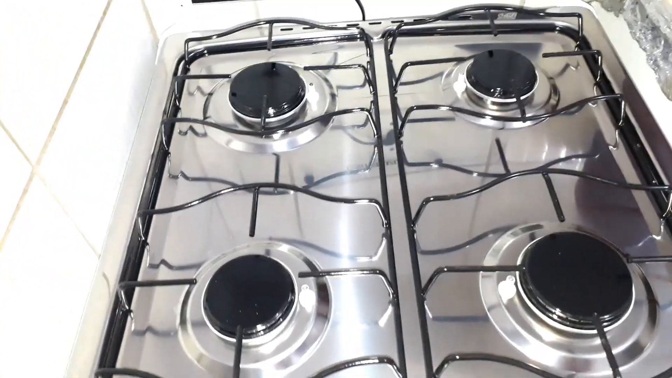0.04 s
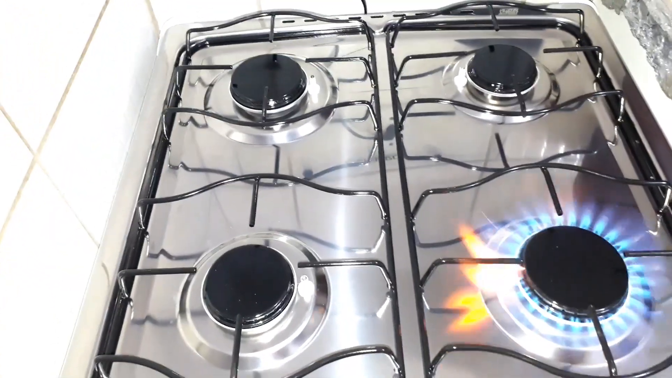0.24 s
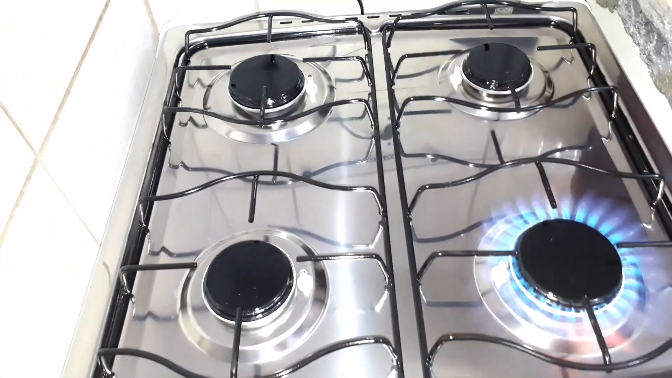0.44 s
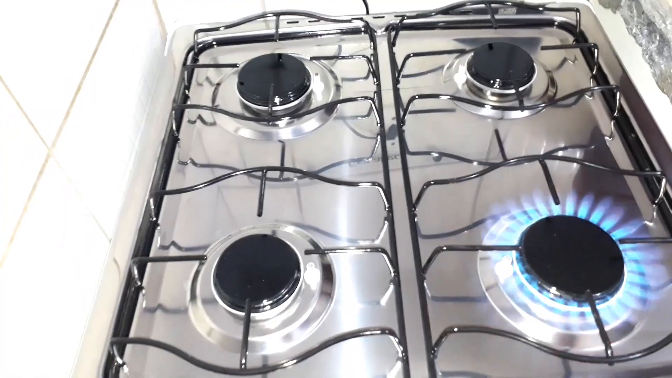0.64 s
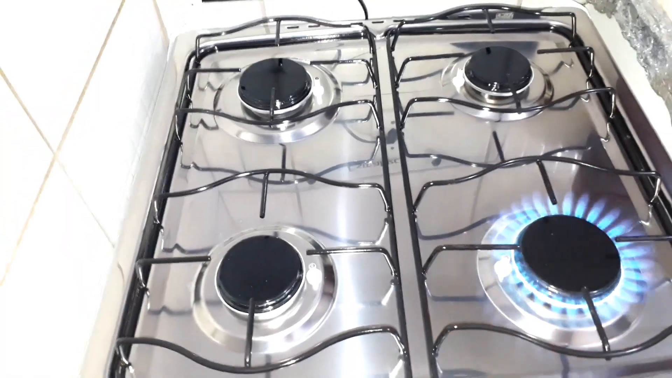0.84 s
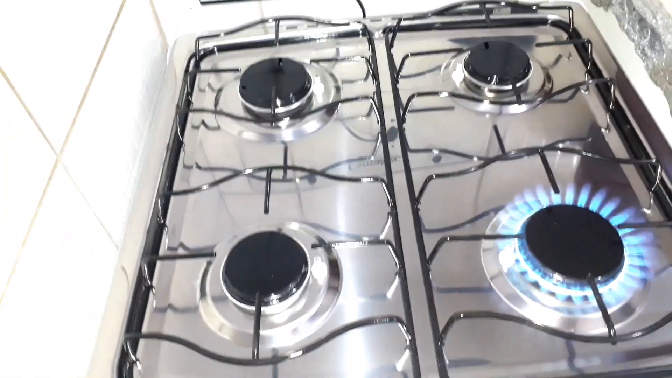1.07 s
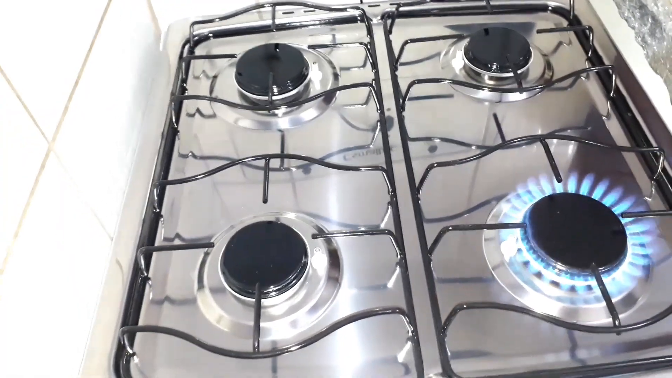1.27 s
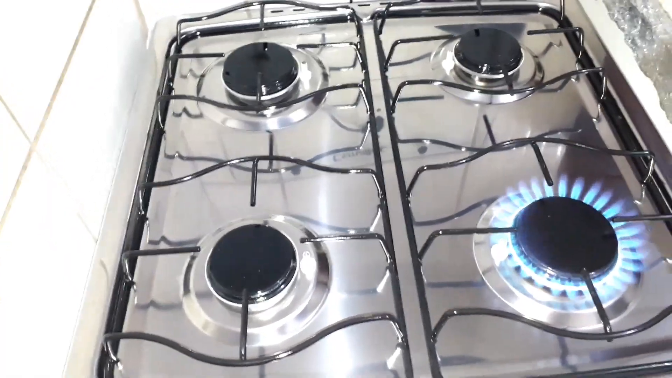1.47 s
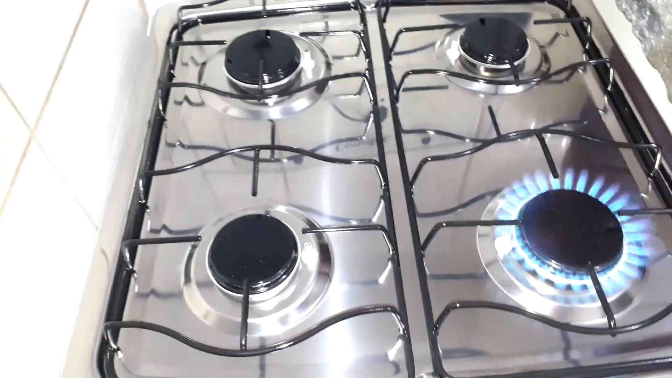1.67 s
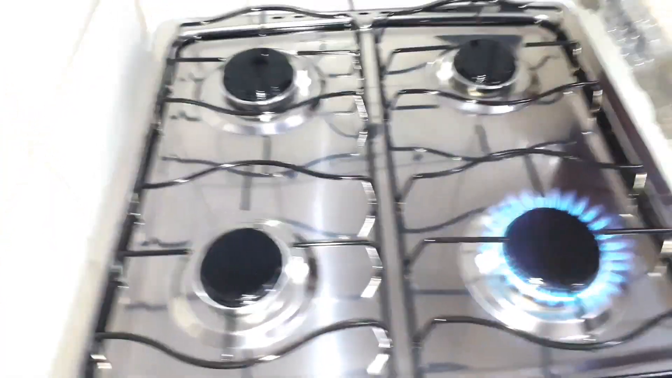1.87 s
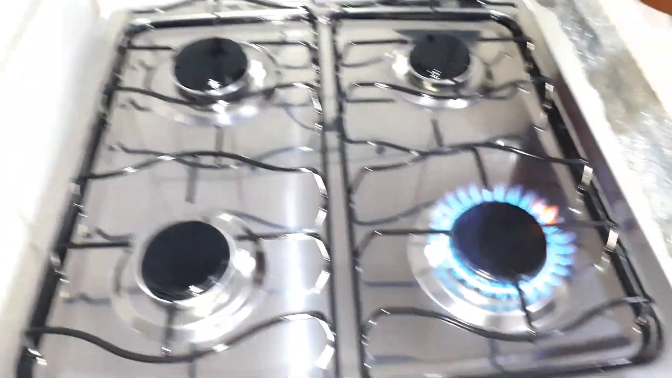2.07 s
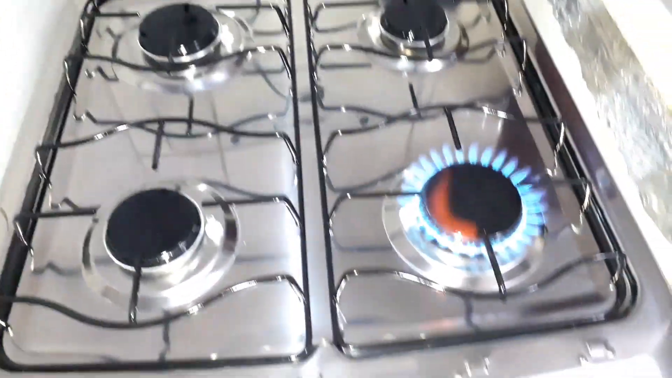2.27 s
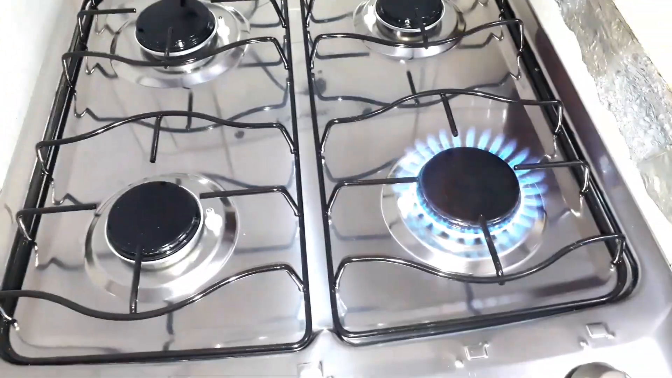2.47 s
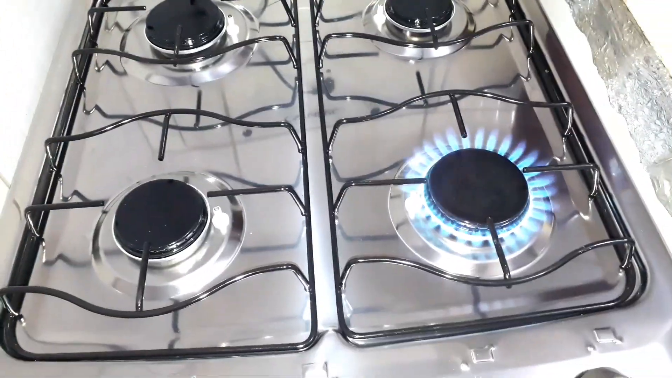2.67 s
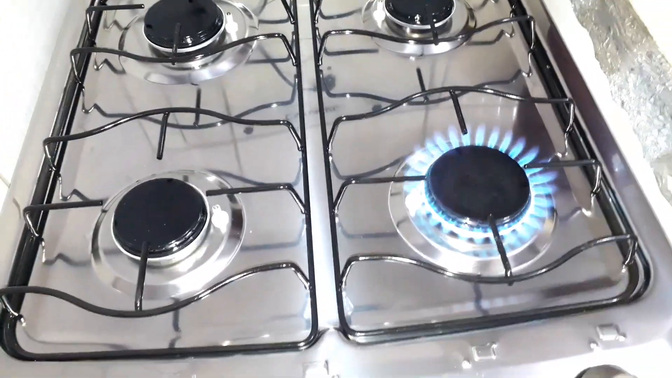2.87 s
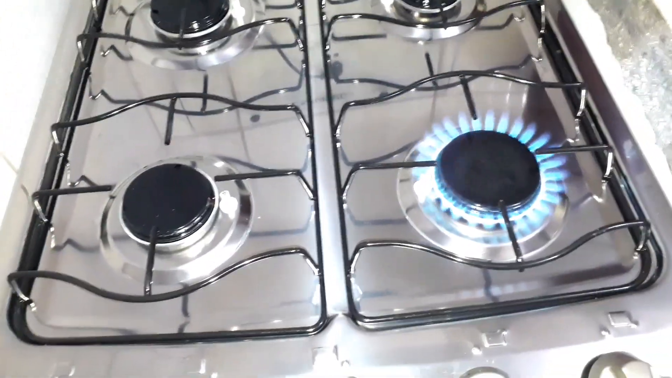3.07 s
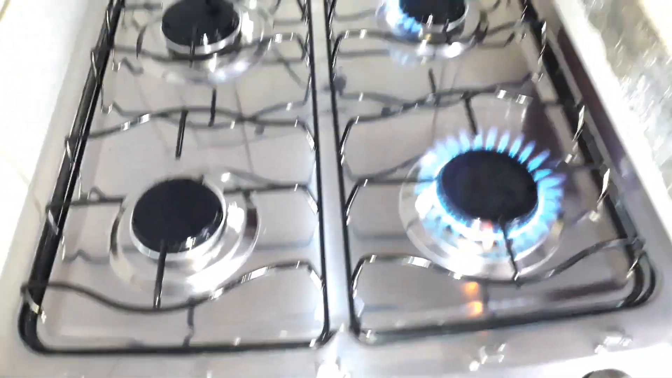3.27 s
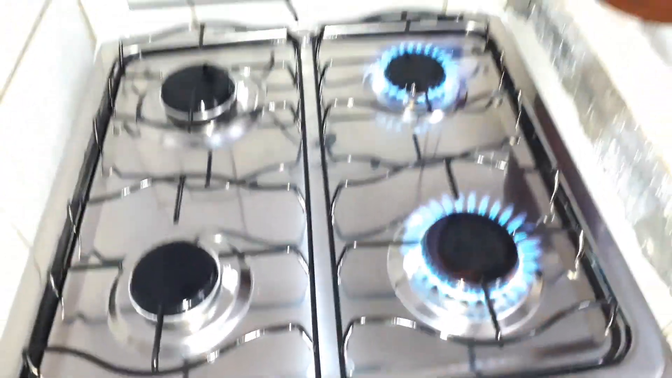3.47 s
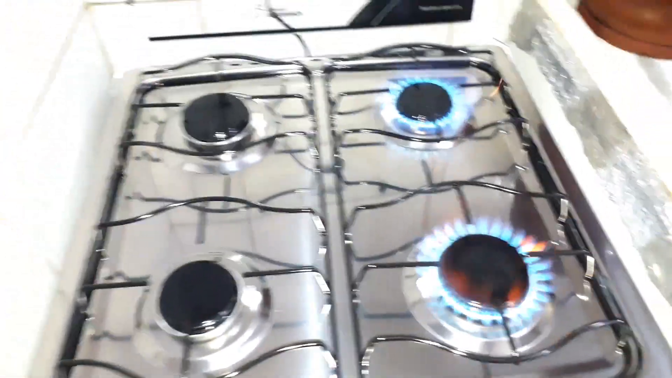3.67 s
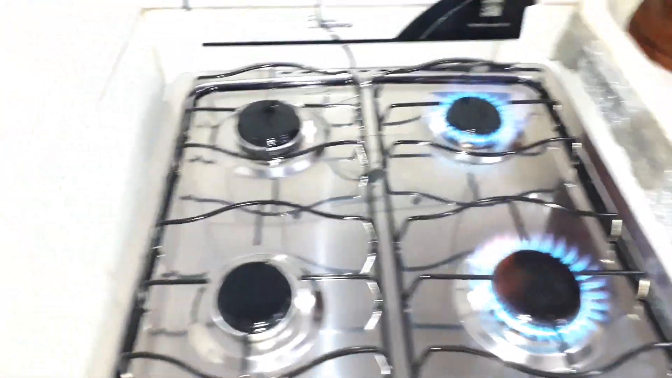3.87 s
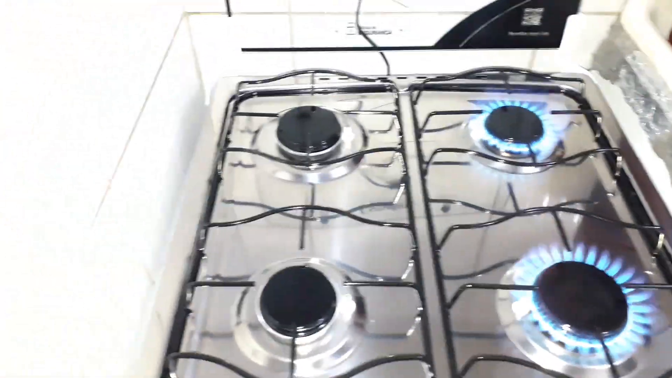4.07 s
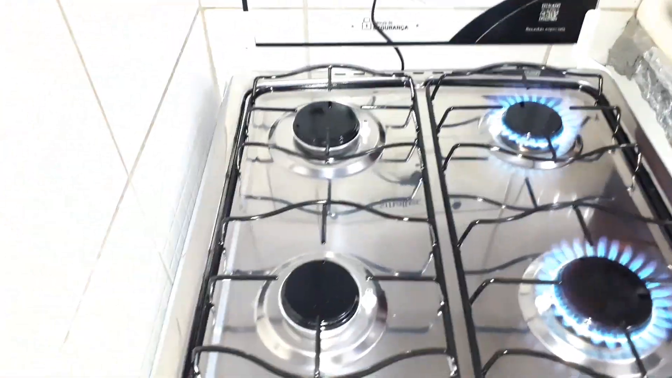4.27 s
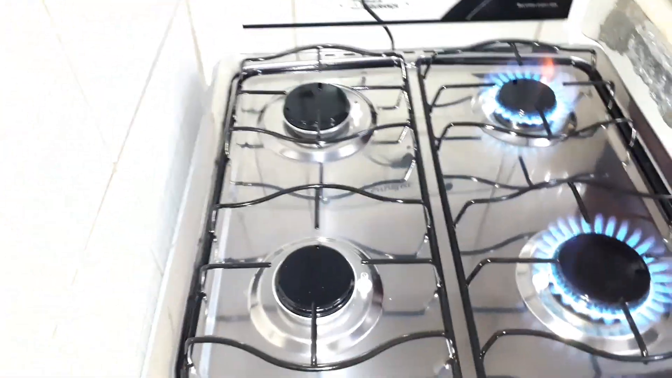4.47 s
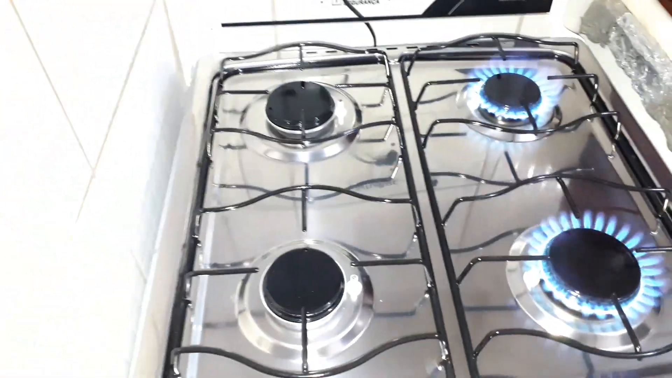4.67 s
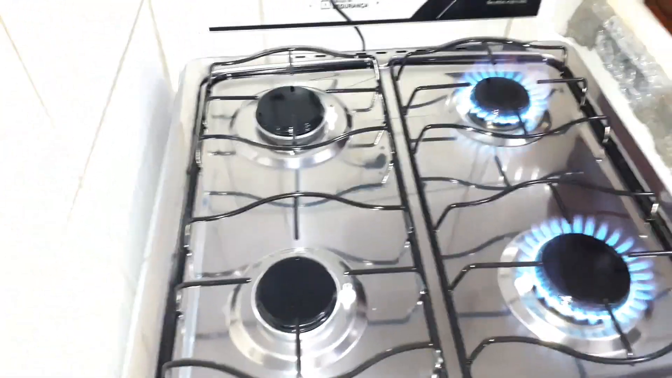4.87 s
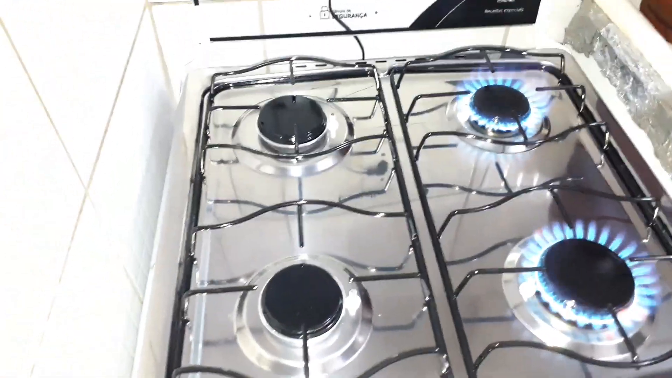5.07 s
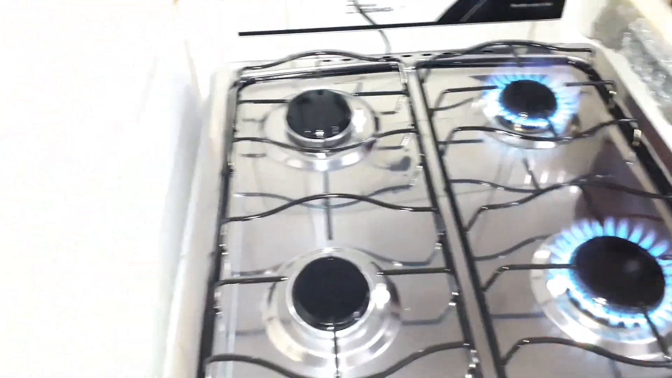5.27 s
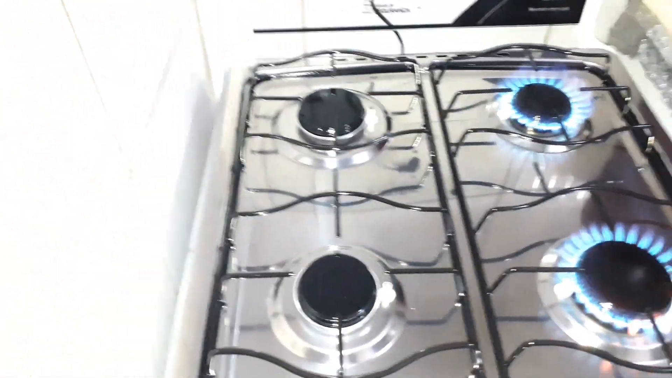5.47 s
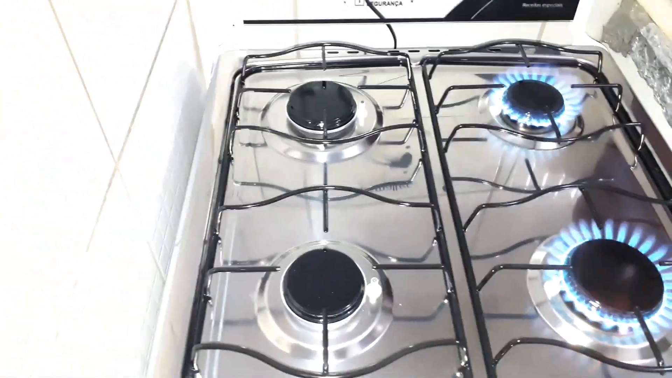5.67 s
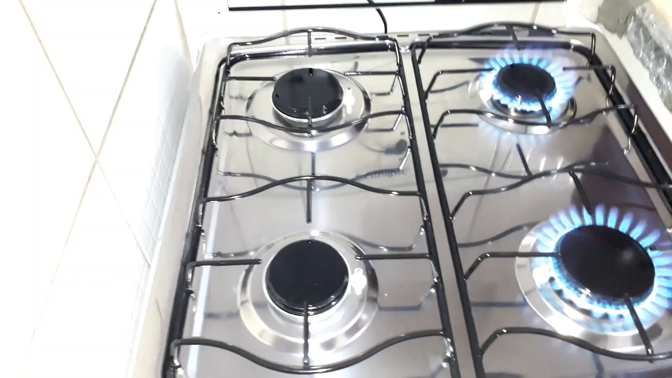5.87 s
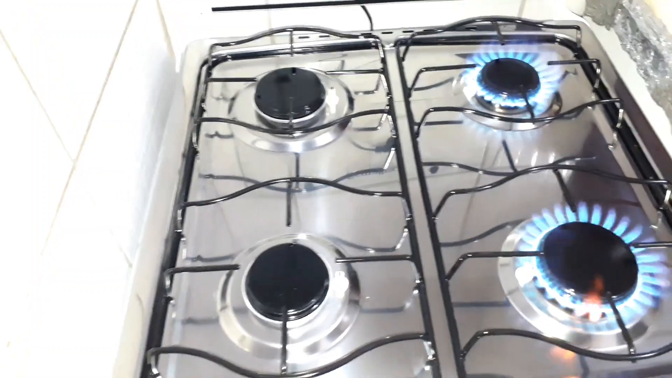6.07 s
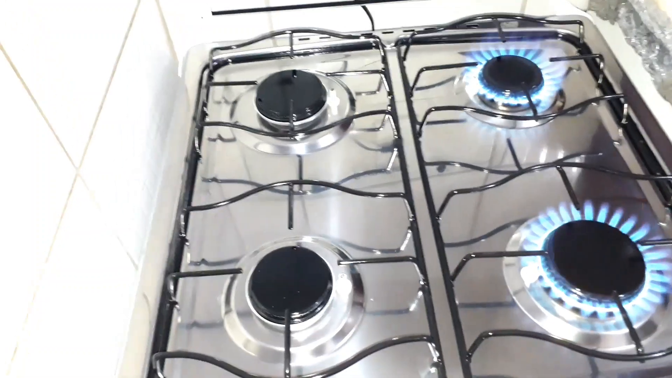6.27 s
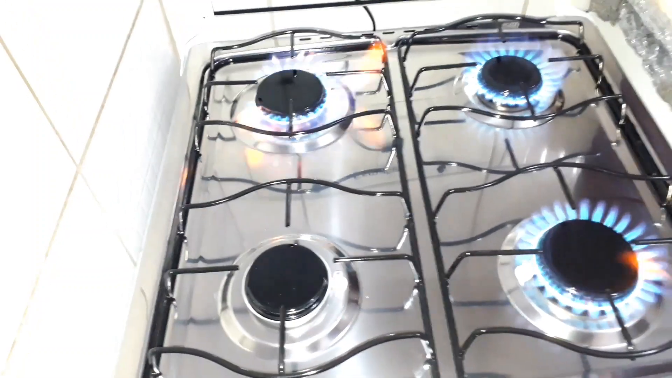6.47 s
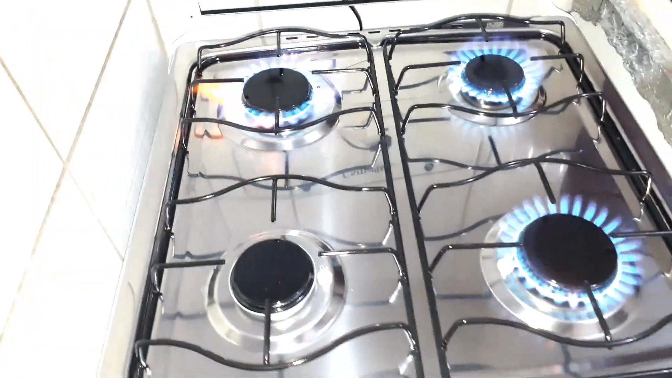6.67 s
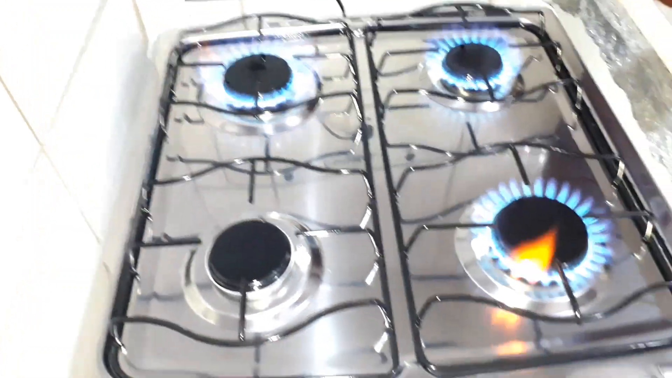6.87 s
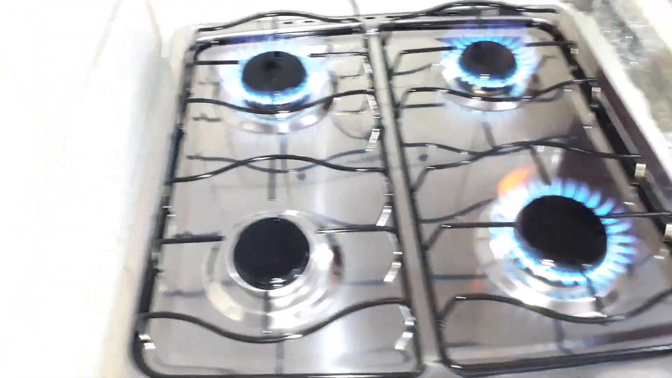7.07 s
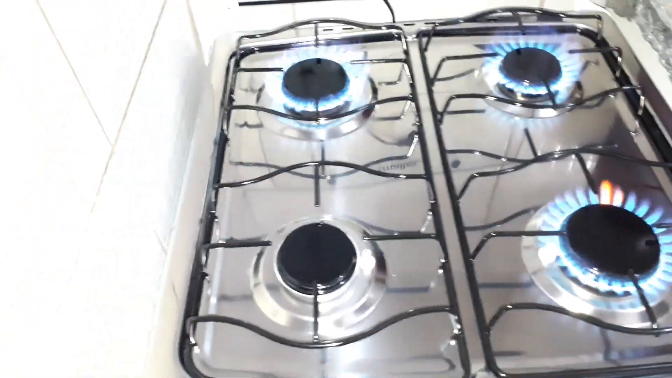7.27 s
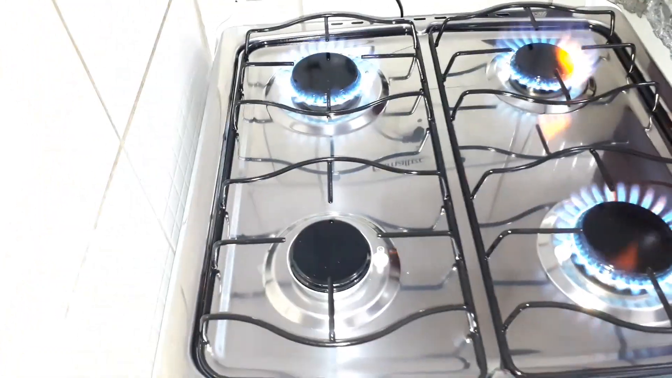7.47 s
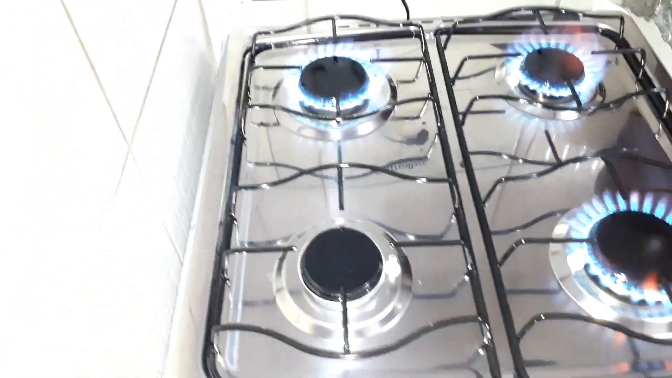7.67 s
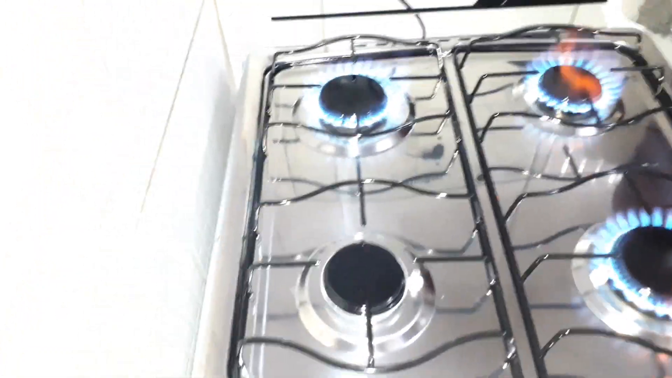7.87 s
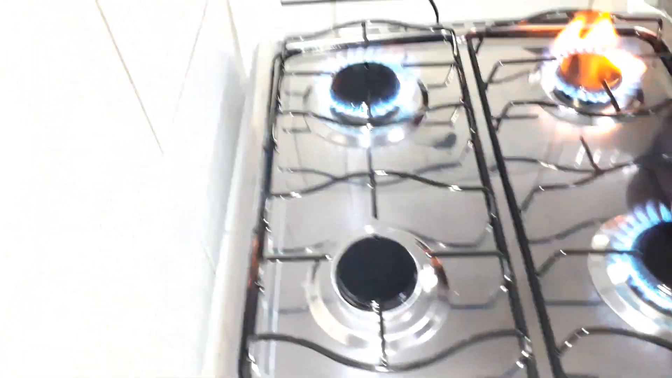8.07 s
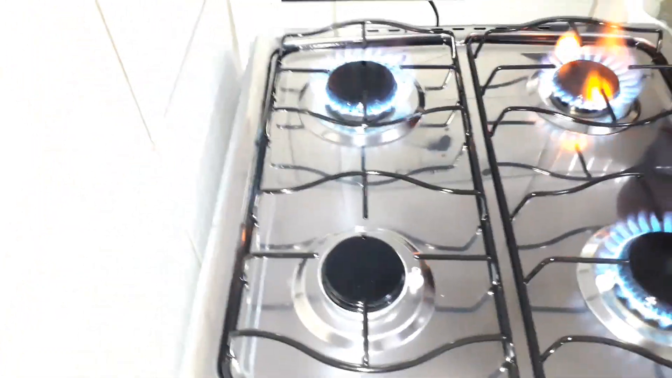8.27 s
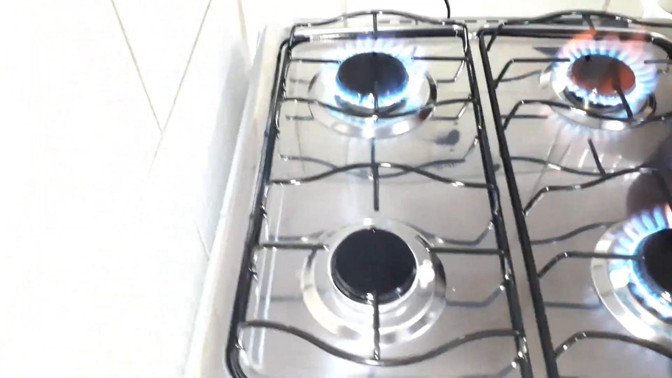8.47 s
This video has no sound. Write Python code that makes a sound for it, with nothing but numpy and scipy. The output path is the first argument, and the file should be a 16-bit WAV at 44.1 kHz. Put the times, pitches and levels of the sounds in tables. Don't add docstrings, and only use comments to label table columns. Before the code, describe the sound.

Close bursts of rapid electric spark snaps, with hard knob clacks and panel thumps between them, over softly hissing, growing gas flames.

```python
import sys
import numpy as np
from scipy import signal
from scipy.fft import rfft, irfft, next_fast_len
from scipy.io import wavfile
from scipy.ndimage import uniform_filter1d

SR = 44100
rng = np.random.default_rng(int(sys.argv[2]) if len(sys.argv) > 2 else 0)


def to_linear_factor(level_db):
    exponent = np.asarray(level_db, float) / 20
    return 10 ** exponent


def to_wav(s):
    ch = np.atleast_2d(s).T
    pcm = np.round(np.clip(ch, -1, 1) * 32767)
    wavfile.write(sys.argv[1], SR, pcm.astype(np.int16))


N = 376173
KNOCK_DELAY_S = .0006
TAIL_SAMPLES = 28000
MAINS_HZ, MAINS_DB = 58.2, -73.5
RECOVER_DB_PER_S = 17.5
SWELL_RISE_DB_PER_S = 86
BODY_DB, BODY_WIDTH = 1.5, .45
EDGE_HZ = 4700

# (frequency [Hz], density [dB/Hz])
RUMBLE_COLOUR = [(26, -47.5), (45, -23.5), (76, -9), (167, 1), (278, -15.5), (318, -8), (354, -23.5),
                 (409, -16), (450, -22.5), (580, -44), (990, -120)]
ROAR_COLOUR = [(260, -21.5), (450, -0.5), (472, -3.5), (1030, -8), (1180, -10), (1700, -16), (2200, -40),
               (3520, -120)]
FLUTTER_COLOUR = [(940, -30.5), (1600, -2), (2330, 0), (2900, -3), (3140, -2.5), (3800, -10.5), (4940, -40),
                  (8360, -120)]
HISS_COLOUR = [(2240, -31), (3800, -5.5), (5500, -5), (6090, -4), (6920, -5), (8750, -10), (10500, -12),
               (13600, -36), (22000, -120)]
THIN_HISS_COLOUR = [(6180, -31), (10500, 2.5), (15100, -0.5), (16200, -13), (16500, -39)]
# (frequency [Hz], width [Hz], lift [dB])
NOZZLE_MODES = [(2470, 120, 2.5), (3050, 70, 5), (5900, 300, 1.5), (8900, 600, 10), (10600, 300, -1.5)]
# (frequency [Hz], level [dB rms])
JET_WHINES = [(4258, -88.5), (5798, -86), (5857, -87.5), (6331, -84), (7693, -96.5), (8043, -88.5),
              (8699, -91.5), (8872, -85), (10174, -87.5)]
# (frequency [Hz], level [dB rms])
TUBE_DRONES = [(317.6, -70.5), (419.9, -71), (473.7, -75), (619.1, -75), (1007, -81)]
BURNERS_LIT = [
    .2,
    3.25,
    6.45,
]
# (peak time [s], roar [dB], fall [dB/s],
# brightness [dB], depth [dB])
SWELLS = [(0.021, -46, 27, -8, -3), (1.7, -53.5, 14.5, 0, 3), (3.0, -56, 38.5, -11, -15),
          (3.36, -48.5, 12.5, -5.5, -5.5), (3.6, -65, 30, 1.5, -4), (3.85, -68.5, 40, -4, 13.5),
          (.57, -69, 60, 3, -3), (5.36, -46.5, 37, 1.5, 0), (6.48, -42.5, 49.5, -7.5, -6),
          (8.1, -63.5, 20, 14.5, 6.5), (8.5, -51, 30, -15, 6.5)]
# (time [s], depth [dB], hold [s])
GAIN_DUCKS = [
    (0.401, -15, 0.31),
    (1.6, -3, 0.72),
    (2.3, -4, 0.51),
    (3.35, -10, 0.58),
    (5.3, -4.5, 0.33),
    (5.8, -0.5, 0.37),
    (6.65, -12, 0.23),
    (7.95, 2, 0.52),
]

# (frequency [Hz], T60 [s])
KITCHEN_T60 = [(100, 0.69), (260, 0.67), (700, 0.69), (1840, 0.48), (4850, 0.38), (12800, 0.29)]
# (frequency [Hz], width [Hz], lift [dB])
OVEN_MODES = [(173, 15, 3), (262, 26, 10), (320, 3.1, 6.5), (417, 35, 1), (807, 44, 1.5), (1047, 40, 3.5),
              (1680, 61, 3), (2030, 66, 4.5), (2800, 68, 4), (3230, 70, 6), (3600, 150, 3), (4200, 120, 1),
              (8900, 380, 5)]
# (time [s], peak [dB], frequency [Hz], T60 [s])
THUMPS = [(1.528, -51, 250, 0.15), (1.981, -28, 151, 0.058), (2.227, -32, 399.6, 0.15),
          (2.252, -28, 267.4, 0.16), (5.147, -45, 270, 0.12), (5.182, -21, 189, 0.33),
          (5.736, -24, 279, 0.2), (5.751, -26.5, 320, 0.34), (6.207, -26.5, 320, 0.4),
          (7.884, -16.5, 403, 0.19), (7.895, -24, 262.2, 0.43), (8.454, -34.5, 294, 0.28)]
# (time [s], peak [dB], frequency [Hz], T60 [s])
CLINKS = [(.02, -40, 1153, 0.34), (.345, -40.5, 2210, 0.11), (1.5232, -24.5, 3690, 0.27),
          (1.524, -24, 3300, 0.092), (1.53, -28.5, 4060, .2), (1.5235, -27, 1750, .12),
          (1.5235, -28, 2972, .2), (1.524, -30, 820, .3), (1.5245, -34, 4400, .08),
          (2.8462, -34.5, 1798, .2), (2.8465, -28, 5400, .09), (2.8495, -25, 6500, .04),
          (2.8475, -32, 8484, .15), (2.846, -42, 1480, 0.22), (2.862, -38.5, 1667, .2),
          (2.879, -38, 1350, 0.16), (2.883, -38, 5350, .12), (5.1243, -20.5, 1680, .05),
          (5.1243, -28.5, 1100, .06), (5.124, -26, 3100, .015), (5.124, -33, 4000, .015),
          (5.137, -26, 1050, .08), (5.144, -26, 1590, 0.044), (6.2, -30, 2050, .03), (6.204, -31, 490, .06),
          (6.219, -34, 327, 0.24), (6.2025, -36, 4900, .03), (6.206, -30, 9200, .04),
          (6.2245, -34, 4950, .04), (6.611, -38.5, 2950, .1), (7.8795, -8.5, 9000, .012),
          (7.881, -21, 3800, 0.056), (7.885, -27, 4280, 0.11), (7.882, -22, 2800, .02),
          (7.88, -18, 6600, .01), (8.31, -61, 3150, .9)]

# (time [s], snap peak [dB], snap pitch [Hz], sizzle [dB], after-sound [dB])
TICKS = [(0.5496, -51, 2900, -12, -14), (0.5499, -41, 1270, -11, -9.5), (1.1643, -46.5, 3260, -21, -10),
         (1.2146, -45.5, 3280, -24, -11), (1.8911, -37.5, 2510, -9, -15), (4.6843, -47, 3300, -7, -11),
         (4.7202, -35, 2960, -12, -20), (4.8259, -44, 2630, -12, -7), (5.0629, -55.5, 2780, -19, 5),
         (5.4142, -50, 2970, -18, -13), (5.7479, -29.5, 2220, -21.5, -29), (8.4033, -44.5, 3090, 0.5, -9.5)]
# (time [s], snap peak [dB], snap pitch [Hz], sizzle [dB], after-sound [dB])
KNOBS = [(1.522, -5, 3350, -9.5, -17), (1.580, -18.5, 1800, -3.5, -13.5), (1.701, -27.5, 1340, -9, -11.5),
         (2.227, -39.5, 1550, -17, -3), (2.242, -38, 3200, -2.5, -7), (2.257, -35.5, 3270, 2.5, -17),
         (5.1235, -22.5, 1680, -20, -7), (5.137, -24.5, 8500, -4.5, -2), (5.183, -27.5, 4540, -6, 0.5),
         (5.393, -32.5, 2570, -16, -8.5), (5.455, -35.5, 7060, -8.5, -3.5), (5.491, -42, 4200, -12, -11),
         (5.6152, -49, 5000, -10, 0), (5.7474, -31.5, 3050, -14.5, -4.5)]
# (time [s], snap peak [dB], snap pitch [Hz], sizzle [dB], after-sound [dB])
FAR_KNOB = [
    (7.641, -56, 3000, -10, 2),
    (7.684, -44.5, 1680, -6, -7.5),
    (7.879, -8, 3800, -8, -10.5),
    (7.914, -23.5, 9500, -3, -6),
    (8.0924, -35, 4500, -8, -2),
    (8.1593, -38.5, 3500, -8.5, 1),
    (8.449, -49.5, 1330, -27, 2),
    (8.519, -48, 4000, -7, -1.5),
]
# (time [s], snap peak [dB], snap pitch [Hz], sizzle [dB], after-sound [dB])
BUTTON_RIGHT = [
    (0.00037, -45, 3450, 11.5, -8),
    (0.366, -32.5, 1900, -16, -9.5),
    (2.8455, -28, 5300, -5, 1.5),
    (3.2968, -33, 3050, -16, -12),
]
# (time [s], snap peak [dB], snap pitch [Hz], sizzle [dB], after-sound [dB])
BUTTON_LEFT = [
    (6.1992, -21.5, 6030, -8.5, -2),
    (6.6496, -29, 4930, -23, -10.5),
]
# (frequency [Hz], density [dB/Hz])
PANEL_COLOUR = [(35, -58), (60, -3.5), (258, 3.5), (546, -3.5), (777, -11.5), (895, -10), (2040, -15.5),
                (2400, -16), (3670, -20), (7960, -19), (9170, -17), (15000, -27.5), (16500, -49.5)]
PANEL_END_COLOUR = [(35, -58), (60, -4), (258, 4), (480, -1.5), (800, -12.5), (1200, -14.5), (2400, -17.5),
                    (4000, -18), (7900, -19), (9100, -14.5), (15000, -29), (16500, -50)]
PLASTIC_COLOUR = [(59, -62), (100, -29.5), (317, -7), (466, -20.5), (699, -20), (1240, -11), (3940, -13.5),
                  (4780, -8.5), (5320, -14.5), (9070, -11), (15100, -19), (16500, -43.5)]
# (frequency [Hz], width [Hz], lift [dB])
SWITCH_RIGHT_MODES = [(1240, 130, 2.5), (1630, 150, 0), (1800, 80, 4), (4340, 97, -0.5), (5300, 220, 6),
                      (6380, 160, 7), (8460, 98, 2), (9700, 150, 1.5)]
SWITCH_LEFT_MODES = [(1605, 96, 2.5), (4930, 250, 4), (6030, 110, 6.5), (7420, 110, 10), (9200, 240, 12),
                     (9550, 100, -2)]

# (time [s], signed height [full scale], rise [s])
WIRING_POPS = [(.00978, -.46, 0), (.09341, -.62, 0), (.09385, 1.5, 0), (.1772, -1.3, 0), (.26063, .74, 0),
               (.34375, -.8, 0), (3.0096, -.045, 0), (3.0931, -.03, 0), (3.17658, .6, .00028),
               (6.2759, -.06, 0), (6.3597, -.14, 0), (6.5265, -.085, 0)]
BURST_STARTS = [
    .0098,
    2.9259,
    6.2758,
]
# (time [s], crack peak [dB], low suction spike [dB], room [dB], burner cap ping [dB])
SPARKS = [(0.0091, -13, -0.5, -9.5, -20.5), (0.0927, -8, -15, -12.5, -28), (0.176, -14.5, -13, -12.5, -25),
          (0.2593, -11, -9, -15, -13), (0.342, -13, -19, -10.5, -10.5), (2.9263, -8, -6, -11.5, -23),
          (3.009, -7.5, -9, -13.5, -32), (3.0924, -10.5, -9.5, -12, -17.5),
          (3.1765, -12.5, -6.5, -12.5, -33), (3.259, -15, -7.5, -12.5, -18.5),
          (6.2751, -7, -5.5, -12.5, -17), (6.3599, -7, -5, -13, -18), (6.4433, -9.5, -8, -15, -18),
          (6.525, -10, -2, -15.5, -12), (6.6095, -12, -7, -12.5, -11.5)]
# (delay [s], level [dB])
CRACK_PATHS = [(0, -2.5), (.0006, 2), (.0011, -3.5), (.0014, -9.5), (.0019, -3.5), (.0026, -13.5),
               (.0035, -0.5), (.0048, -13), (.0063, -12.5), (.0080, -1.5), (.0087, -3), (.0097, -12.5),
               (0.0111, -7.5)]
# (frequency [Hz], density [dB/Hz])
CRACK_COLOUR = [(880, -30.5), (1500, -11), (4090, -8), (6890, -0.5), (7770, -3), (8860, 5.5), (15200, 3.5),
                (16000, 4.5), (16500, -18.5)]
# (frequency [Hz], width [Hz], lift [dB])
GRATE_MODES = [(3300, 160, 4), (8650, 280, 4.5)]


def unit(x):
    return x / np.sqrt(np.mean(x ** 2, axis=-1, keepdims=True) + 1e-20)


def along(points, hz):
    f, v = np.transpose(points)
    return np.interp(np.log(hz + 1), np.log(f + 1), v)


def filtered(x, response):
    m = next_fast_len(x.shape[-1] + 8192)
    spectrum = rfft(x, m) * response(np.fft.rfftfreq(m, 1 / SR))
    return irfft(spectrum, m)[..., :x.shape[-1]]


def causal(x, colour):
    gain = to_linear_factor(along(colour, np.fft.rfftfreq(2048, 1 / SR)))
    cepstrum = irfft(np.log(gain + 1e-6))
    cepstrum[1:1024] *= 2
    kernel = irfft(np.exp(rfft(cepstrum[:1025], 2048)))
    return signal.fftconvolve(x, kernel[None] / abs(kernel).max(), axes=1)[:, :x.shape[1]]


def hollow(hz, modes):
    return sum(db / (1 + (2 * (hz - centre) / width) ** 2) for centre, width, db in modes)


def placed(times_s, rows):
    start = np.round(np.asarray(times_s) * SR).astype(int)[:, None]
    at = start + np.arange(rows.shape[1])
    return np.bincount(at.ravel(), rows.ravel(), N + 2 * SR)[:N]


def whines():
    t, out = np.arange(N) / SR, 0
    for hz, db in JET_WHINES + TUBE_DRONES + [(MAINS_HZ, MAINS_DB)]:
        knots = rng.standard_normal(50)
        slow = lambda v: np.interp(t * 5, np.arange(len(v)), v)
        swell = slow(np.sqrt(2) * to_linear_factor(db + 1.9 * knots))
        out = out + swell * np.sin(2 * np.pi * hz * t + slow(1.5 * knots))
    return out


def rush(colour_db, patchy_db):
    z = signal.stft(rng.standard_normal(N + 512), nperseg=512)[2]
    field = uniform_filter1d(rng.standard_normal(z.shape), 5, 0)
    field = uniform_filter1d(field, 10, 1)
    noise = signal.istft(z * to_linear_factor(patchy_db * field / field.std()), nperseg=512)[1][:N]
    return unit(filtered(noise, lambda hz: to_linear_factor(colour_db(hz))))


def air():
    t = np.arange(0, N + 256, 256) / SR
    sample_s = np.arange(N) / SR

    s, depth_db, held_s = np.transpose(GAIN_DUCKS)[..., None]
    duck_db = np.minimum(depth_db + RECOVER_DB_PER_S * np.maximum(t - s - held_s, 0), 0)
    gain_db = np.where(t > s, duck_db, 0).min(axis=0)
    burners = np.sum(t > np.array(BURNERS_LIT)[:, None], axis=0)

    s, roar_db, fall_db_per_s, bright_db, deep_db = np.transpose(SWELLS)[..., None]
    swell_db = roar_db - np.where(t > s, fall_db_per_s * (t - s), SWELL_RISE_DB_PER_S * (s - t))
    bright_swell_db = swell_db + bright_db

    def level(steady_db, db_per_burner, ducked, surge_db):
        steady = to_linear_factor(steady_db + db_per_burner * burners + ducked * gain_db)
        return np.interp(sample_s, t, np.sqrt(steady ** 2 + np.sum(to_linear_factor(surge_db) ** 2, axis=0)))

    rumble = level(-54.5, 3.13, 0.86, swell_db + deep_db)
    rumble = rumble * rush(lambda hz: along(RUMBLE_COLOUR, hz) + 0.71 * hollow(hz, OVEN_MODES), patchy_db=2.5)
    roar = level(-63.5, 1.85, 0.99, swell_db)
    roar = roar * rush(lambda hz: along(ROAR_COLOUR, hz) + 0.13 * hollow(hz, OVEN_MODES), patchy_db=0.3)
    flutter = level(-64, 0.99, 0.53, bright_swell_db - 4.5)
    flutter = flutter * rush(lambda hz: along(FLUTTER_COLOUR, hz) + hollow(hz, NOZZLE_MODES), patchy_db=1.4)
    hiss = level(-66.5, -.4, 0.62, bright_swell_db - 11.0)
    hiss = hiss * rush(lambda hz: along(HISS_COLOUR, hz) + hollow(hz, NOZZLE_MODES), patchy_db=0.3)
    thin = level(-71.5, 1.6, 0.68, bright_swell_db - 22)
    thin = thin * rush(lambda hz: along(THIN_HISS_COLOUR, hz), patchy_db=0.3)
    tones = np.interp(sample_s, t, to_linear_factor(3.5 + 0.82 * gain_db)) * whines()
    return rumble + roar + flutter + hiss + thin + tones


def room(colour_db, count, size, stretch, wait_s, rise_s):
    noise = rng.standard_normal((count, size))
    noise = unit(filtered(noise, lambda hz: to_linear_factor(colour_db(hz))))
    hz, t, z = signal.stft(noise, SR, nperseg=256)
    lumps = to_linear_factor(1.1 * rng.standard_normal((count, 1, len(t))) * np.exp(-t / .25))
    decay = to_linear_factor(-60 * t / (stretch * along(KITCHEN_T60, hz))[:, None])
    tail = signal.istft(z * lumps * decay, SR, nperseg=256)[1][:, :size]
    since_s = np.maximum(np.arange(size) / SR - wait_s, 0)
    return tail * (1 - np.exp(-since_s / rise_s))


def thumps():
    s, db, hz, t60_s = np.transpose(THUMPS)[..., None]
    t = np.arange(SR // 4) / SR
    pair = np.sin(2 * np.pi * hz * t) + 0.38 * np.sin(2 * np.pi * 1.52 * hz * t)
    envelope = to_linear_factor(db - 3.5 - 60 * t / t60_s) * (1 - np.exp(-t / 0.005))
    return placed(s[:, 0], envelope * pair)


def clinks():
    s, db, hz, t60_s = np.transpose(CLINKS)[..., None]
    t = np.arange(SR // 4) / SR
    wander = np.cumsum(rng.standard_normal((len(s), len(t))), axis=1) * 0.055
    envelope = to_linear_factor(db - 60 * t / t60_s) * (1 - np.exp(-t / .0003))
    return placed(s[:, 0], envelope * np.sin(2 * np.pi * hz * t + wander))


def ringing(modes, count, t60_s):
    hz, _, db = np.transpose([m for m in modes if m[0] > 600])[..., None]
    luck = rng.standard_normal((count, len(hz), 2))
    t = np.arange(SR // 8) / SR
    fade = to_linear_factor(db + 0.81 * luck[..., :1] - 60 * t / (t60_s * (1500 / hz) ** 0.36))
    tones = np.sin(2 * np.pi * hz * (1 + 0.0054 * luck[..., 1:]) * t)
    return np.sum(fade * tones, axis=1) * (1 - np.exp(-t / 0.0015))


def knocks(table, spectrum, modes, sizzle_ref_db, boom_at_full_db, boom_lost_per_db, snap_t60_s,
           ring_db, ring_t60_s, size, stretch, rise_s):
    s, db, snap_hz, sizzle_db, wet_db = np.transpose(table)[..., None]
    boom_db = boom_at_full_db - boom_lost_per_db * db
    t = np.arange(1000) / SR
    snap = np.sin(2 * np.pi * snap_hz * t) * to_linear_factor(-60 * t / snap_t60_s) * (1 - np.exp(-t / 0.000082))
    grit = to_linear_factor(sizzle_db) * rng.standard_normal((len(s), len(t))) * to_linear_factor(-60 * t / 0.013)
    snap = snap + filtered(grit, lambda hz: 1 / (1 + 1j * hz / 9000) ** 2)

    def colour_db(hz):
        low = np.clip(np.log(900 / (hz + 1)) / np.log(2), 0, 1) * boom_db
        high = np.clip(np.log((hz + 1) / 4300) / np.log(1.4), 0, 1) * (sizzle_db - sizzle_ref_db)
        body = BODY_DB / (1 + ((hz / snap_hz - 1) / BODY_WIDTH) ** 4)
        return along(spectrum, hz) + hollow(hz, modes) + body + low + high

    tail = room(colour_db, len(s), size, stretch, wait_s=0.00011, rise_s=rise_s)
    ring = to_linear_factor(ring_db) * ringing(modes, len(s), ring_t60_s)
    parts = (to_linear_factor(3.5) * snap, ring, to_linear_factor(wet_db) * tail)
    return sum(placed(s[:, 0] + KNOCK_DELAY_S, to_linear_factor(db) * part) for part in parts)


def ticks():
    return knocks(TICKS, PANEL_COLOUR, OVEN_MODES, -2, boom_at_full_db=-26, boom_lost_per_db=0.47,
                  snap_t60_s=0.0054, ring_db=-19, ring_t60_s=0.045,
                  size=TAIL_SAMPLES // 3, stretch=1.0, rise_s=.002)


def knobs():
    near = knocks(KNOBS, PANEL_COLOUR, OVEN_MODES, -4.5, boom_at_full_db=-13.0, boom_lost_per_db=0.19,
                  snap_t60_s=0.0057, ring_db=-40.0, ring_t60_s=0.5,
                  size=TAIL_SAMPLES, stretch=1.276, rise_s=.001)
    far = knocks(FAR_KNOB, PANEL_END_COLOUR, OVEN_MODES, -5.5, boom_at_full_db=-12.5, boom_lost_per_db=0.16,
                 snap_t60_s=0.0057, ring_db=-35, ring_t60_s=0.35,
                 size=TAIL_SAMPLES * 3 // 4, stretch=1.275, rise_s=0.0014)
    return near + far


def button():
    right = knocks(BUTTON_RIGHT, PLASTIC_COLOUR, SWITCH_RIGHT_MODES, -11.5, boom_at_full_db=-18.5,
                   boom_lost_per_db=0.95, snap_t60_s=0.0039, ring_db=-20.0, ring_t60_s=0.15,
                   size=TAIL_SAMPLES, stretch=0.99, rise_s=0.00057)
    left = knocks(BUTTON_LEFT, PLASTIC_COLOUR, SWITCH_LEFT_MODES, -12, boom_at_full_db=-13.5,
                  boom_lost_per_db=0.94, snap_t60_s=0.0025, ring_db=-22.5, ring_t60_s=0.12,
                  size=TAIL_SAMPLES, stretch=0.82, rise_s=0.00066)
    return right + left


def pops():
    s, height, rise_s = np.transpose(WIRING_POPS)[..., None]
    ramp = np.arange(32) <= rise_s * SR
    impulses = placed(s[:, 0], height * ramp / ramp.sum(axis=1, keepdims=True))

    def response(hz):
        f = 1j * hz
        low_cut = f ** 3 / ((f + 88) * (f + 127) * (f * f + 76 * f + 70 ** 2))
        return low_cut * SR / (2 * np.pi * (1 + f / EDGE_HZ))

    return filtered(impulses, response)


def sparks():
    s, db, suction_db, wet_db, ping_db = np.transpose(SPARKS)
    first = np.array(BURST_STARTS)[abs(s[:, None] - BURST_STARTS).argmin(axis=1)]
    s = first + np.round((s - first) * 12) / 12

    delay_s, path_db = np.transpose(CRACK_PATHS)
    luck = rng.standard_normal((len(s), len(delay_s), 2))
    jitter_s = (delay_s > 0) * 0.00029 * luck[..., 0]
    at = np.round(SR * (delay_s + jitter_s)).astype(int).clip(0)
    arrivals = np.zeros((len(s), 1500))
    np.add.at(arrivals, (np.arange(len(s))[:, None], at), to_linear_factor(path_db + 3.2 * luck[..., 1]))

    t = np.arange(arrivals.shape[1]) / SR
    spread = signal.fftconvolve(arrivals, to_linear_factor(-60 * t[None] / 0.0038), axes=1)[:, :len(t)]
    needles = (spread + 0.57 * to_linear_factor(-60 * t / 0.034)) * rng.standard_normal(arrivals.shape)
    suction = filtered(-arrivals * to_linear_factor(-60 * t / 0.044),
                       lambda hz: 1j * hz / (600 + 1j * hz) / (1 + 1j * hz / 4000) ** 2)
    ping = to_linear_factor(ping_db[:, None] - 60 * t / 0.013) * np.sin(2 * np.pi * 3500 * t)
    direct = causal(needles, CRACK_COLOUR) + 15 * to_linear_factor(suction_db)[:, None] * suction + 4 * ping
    direct = to_linear_factor(db - 12.0)[:, None] * direct

    tail = room(lambda hz: along(CRACK_COLOUR, hz) + hollow(hz, GRATE_MODES), len(s),
                size=TAIL_SAMPLES // 2, stretch=0.93, wait_s=0.0053, rise_s=0.0018)
    return placed(s, direct) + placed(s, to_linear_factor(db + wet_db)[:, None] * tail)


def scene():
    handling = thumps() + clinks() + ticks() + knobs() + button()
    return (air() + handling + pops() + sparks())[None]


def roll_off(x):
    return signal.sosfilt(signal.butter(12, 16970, fs=SR, output="sos"), x)


def record(dry):
    held = dry / (1 + abs(dry / .98) ** 8) ** (1 / 8)
    mix = filtered(held, lambda hz: to_linear_factor(np.interp(hz, [15700, 16100, 17000], [0, -20, -22])))
    return roll_off(mix)


dry = scene()
out = record(dry)
to_wav(out)
```